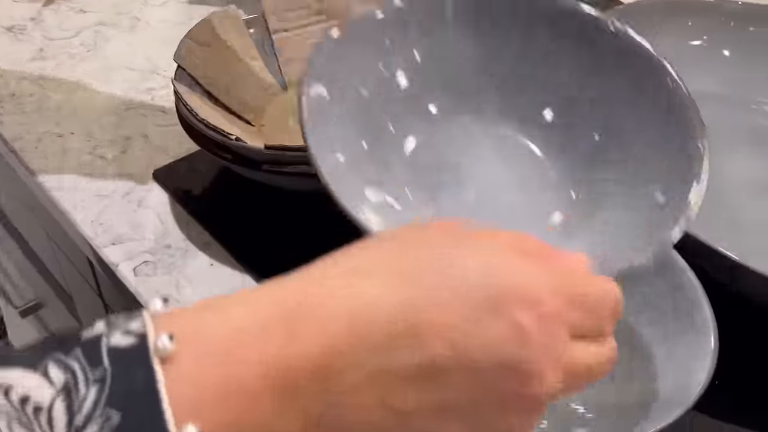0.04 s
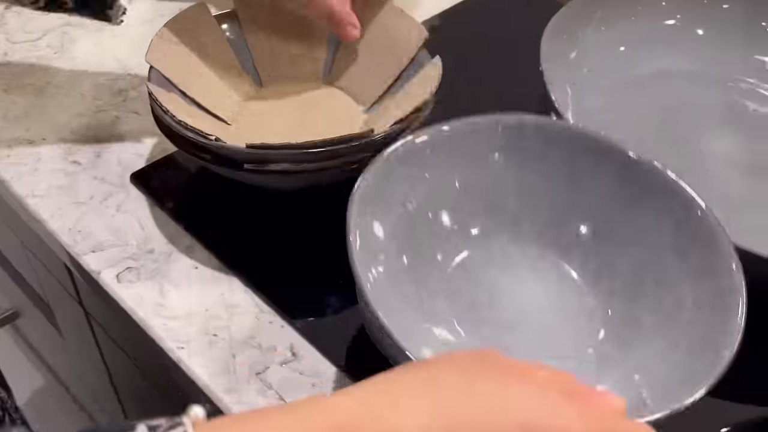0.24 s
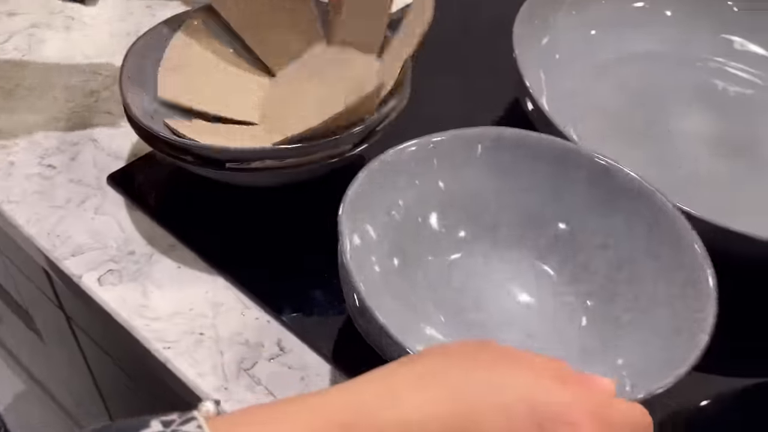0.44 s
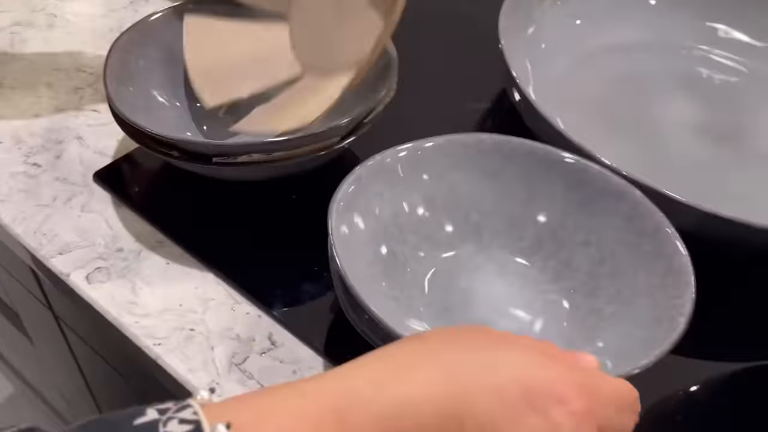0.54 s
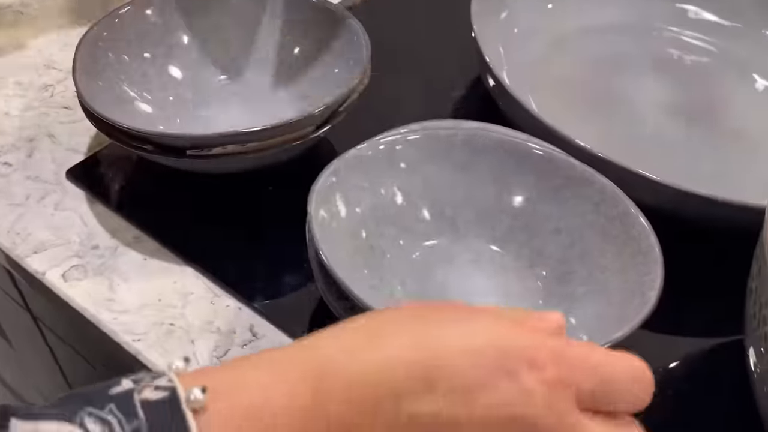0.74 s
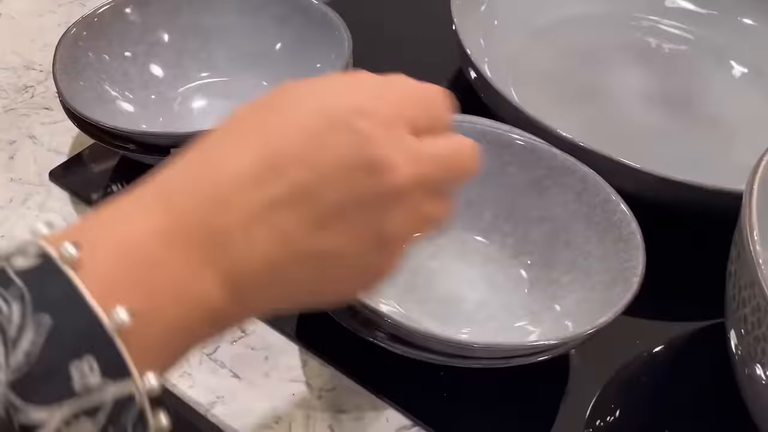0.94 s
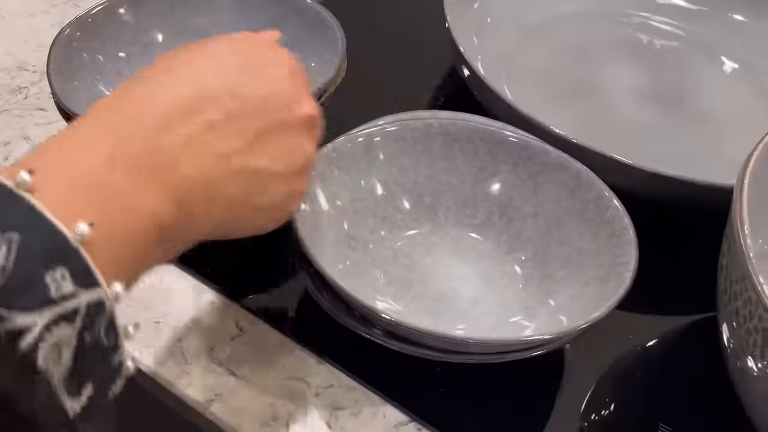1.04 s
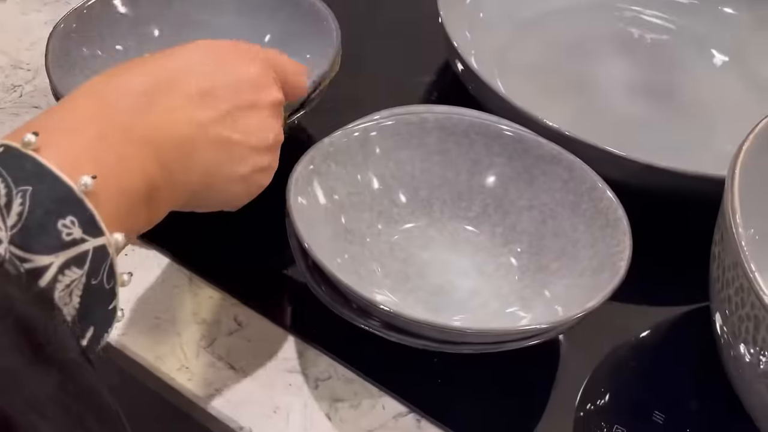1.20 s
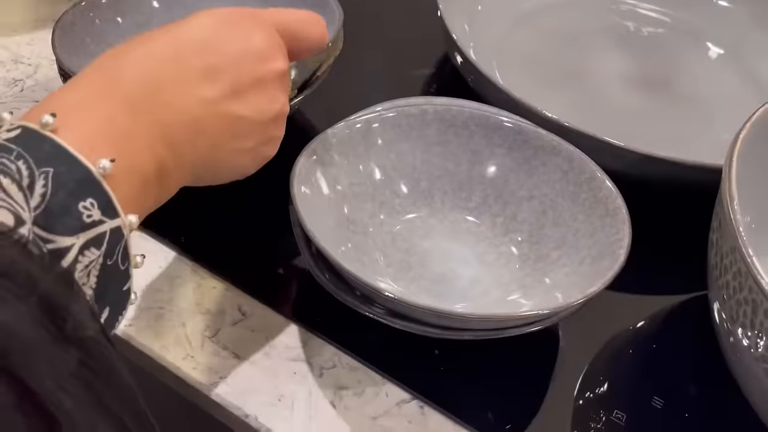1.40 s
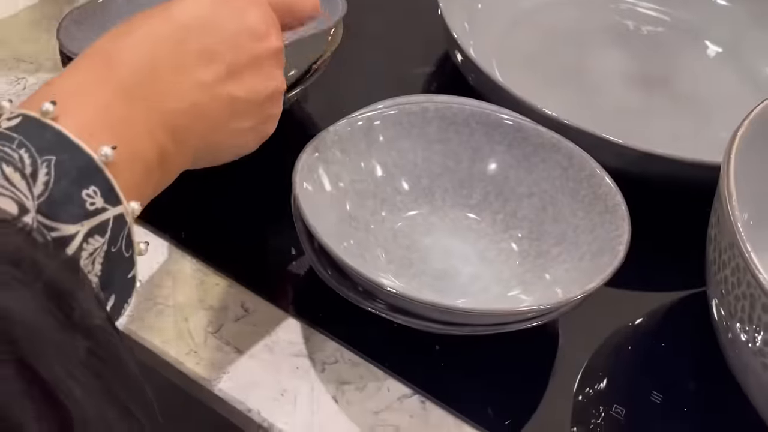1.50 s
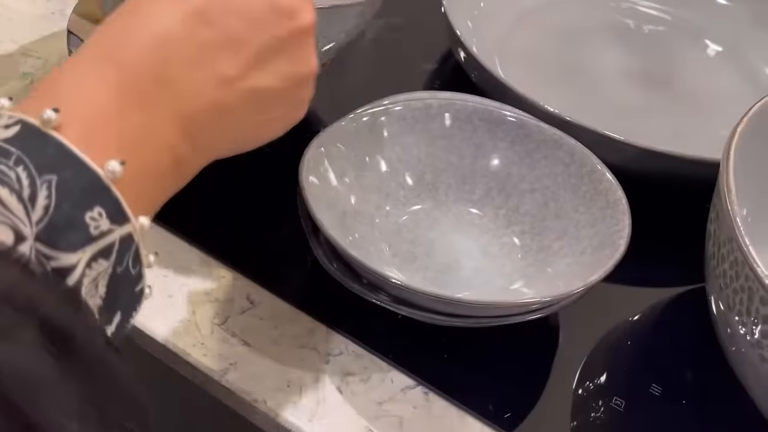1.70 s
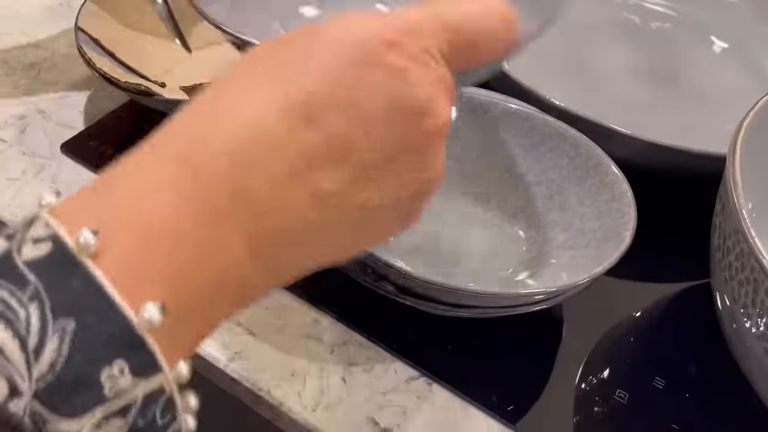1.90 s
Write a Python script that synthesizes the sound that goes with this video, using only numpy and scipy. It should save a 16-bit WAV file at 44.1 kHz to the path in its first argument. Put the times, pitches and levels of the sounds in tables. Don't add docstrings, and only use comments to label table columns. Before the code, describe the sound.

Two hard, short clinks of glazed bowls being stacked, followed by soft rustles and tiny touches

```python
import sys
import numpy as np
from scipy import signal
from scipy.fft import rfft, irfft
from scipy.io import wavfile
from scipy.ndimage import uniform_filter1d

SR = 44100
rng = np.random.default_rng(int(sys.argv[2]) if len(sys.argv) > 2 else 0)


def nominal_scale(level):
    x = np.asarray(level, float) / 20
    return 10 ** x


def unload_audio(sound):
    columns = np.transpose(np.atleast_2d(sound))
    steps = np.round(np.clip(columns, -1, 1) * 32767)
    wavfile.write(sys.argv[1], SR, steps.astype(np.int16))


N = 85995
T = np.arange(N) / SR

# frequency in Hz, level in dB.
HUM_COLOUR = [(30, -3.5), (80, -3.5), (270, -18.5), (900, -27.5), (1500, -39.5), (2400, -67), (10600, -57),
              (14000, -60.5)]
# frequency in Hz, level in dB.
HUM_TONES = [(62, -59), (513, -65), (1005, -80)]
# time in seconds, level in dB.
RUSTLE_LEVEL = [(0, -81), (.15, -78), (0.172, -54), (.3, -46.5), (0.499, -56), (.85, -72), (0.892, -46.5),
                (1.0, -55.5), (1.09, -57.5), (1.201, -55.5), (1.301, -62), (1.378, -48), (1.46, -58.5),
                (1.55, -75), (1.73, -84.5), (1.752, -54), (1.821, -64.5), (1.95, -86)]
# frequency in Hz, level in dB.
RUSTLE_COLOUR = [(300, 13), (900, -0.5), (2000, -8), (4000, -8.5), (6500, -11.5), (9000, -9),
                 (12500, -11.5), (14500, -32.5)]
# time in seconds, level in dB.
RUMBLE_LEVEL = [(0, -66), (.1, -51.5), (.22, -48), (.35, -62), (.56, -47), (.7, -63), (.87, -55),
                (1.05, -74), (1.6, -67), (1.95, -70)]
# start in seconds, level in dB, pitch in Hz,
# time to fall 60 dB in seconds.
KNOCKS = [(.062, -40.5, 600, 0.047), (0.089, -40.5, 602, 0.047), (.174, -42, 775, 0.15),
          (.248, -6.5, 927, 0.051), (.249, -6, 313.6, 0.04), (0.253, -8, 1295, 0.011),
          (.330, -17, 721, 0.052), (.333, -19, 238.5, 0.064), (.471, -16, 983, 0.024),
          (.474, -21, 208, 0.07), (0.4731, -19, 400, 0.063), (.482, -24, 524, 0.016),
          (.472, -30.5, 2950, 0.025), (.478, -32, 1760, 0.031), (0.536, -8, 975, 0.017),
          (.537, -5, 232, 0.03), (0.544, -32.5, 88, .3), (.549, -20.5, 888, .06), (.552, -23.5, 323, .05),
          (0.5597, -3, 869, 0.04), (.574, -21, 862, 0.12), (.610, -21, 902, 0.0374),
          (.562, -18.5, 392.6, 0.083), (.728, -39, 855, 0.17), (.78, -41.5, 895, 0.22),
          (0.894, -25.5, 457, 0.11), (0.915, -39, 205.4, 0.18), (0.944, -40.5, 248, 0.11),
          (.258, -18.5, 1006, 0.03), (.29, -28, 392, .05), (.58, -24, 884, .09), (0.5601, -15, 1750, 0.031),
          (.606, -30, 415, 0.066), (1.362, -37.5, 1410, .05), (1.139, -44, 200, 0.074),
          (.984, -43, 397, 0.035), (1.1389, -38.5, 464, 0.078), (1.154, -45.5, 585, 0.012),
          (1.360, -30, 770, 0.058), (1.361, -31, 377, 0.11), (1.399, -38.5, 353, 0.21),
          (1.435, -44, 801, 0.054), (1.487, -39.5, 352.3, 0.16), (1.798, -42, 322, 0.054),
          (1.866, -41.5, 320.6, 0.11)]
# start in seconds, end in seconds,
# first pitch in Hz, last pitch in Hz, level in dB.
SINGING_SLIDES = [(.17, .225, 2800, 2800, -61), (.17, .22, 1614, 1640, -63), (.27, .37, 4231, 4220, -45.5),
                  (.36, .52, 4215, 4231, -54.5), (.64, .86, 790, 930, -45), (.66, .87, 2790, 2700, -58.5),
                  (.68, .88, 2380, 2470, -59.5), (.7, .88, 1585, 1590, -61.5), (.76, 1.25, 1008, 999, -65),
                  (1.59, 1.645, 951, 961, -70.5), (.1, .165, 558, 598, -59.5)]
# start in seconds, end in seconds, first pitch in Hz,
# last pitch in Hz, level in dB.
FOOT_SCRAPES = [
    (1.27, 1.41, 3870, 4130, -68.5),
    (1.28, 1.4, 4800, 4500, -66),
    (1.33, 1.39, 3240, 3230, -63.5),
    (1.37, 1.45, 1400, 1313, -60.5),
]
# start in seconds, level in dB, centre in Hz,
# time to fall 60 dB in seconds.
CRACKS = [(.137, -60, 5000, 0.015), (0.169, -43.5, 6000, 0.03), (0.213, -45.5, 8950, 0.038),
          (0.240, -27, 1920, 0.054), (0.248, -10.5, 3227, 0.05), (.2575, -31, 4050, 0.034),
          (0.332, -34, 1800, 0.033), (.471, -31.5, 1578, 0.026), (0.529, -22, 2470, 0.05),
          (.5338, -15, 4700, 0.019), (.884, -40, 14400, .07), (1.205, -53, 14500, .05),
          (1.744, -58.5, 14920, .02), (0.534, -10, 3200, 0.043), (0.5335, -18, 9650, 0.044),
          (0.2475, -19.5, 12350, 0.045), (0.555, -20, 4480, 0.045), (1.285, -57.5, 4445, 0.24),
          (0.883, -41.5, 9100, 0.062), (0.892, -41, 3210, 0.067), (1.138, -55.5, 2563, 0.047),
          (1.209, -42, 10040, 0.01), (1.361, -47, 1810, 0.035), (1.430, -44.5, 4500, 0.038),
          (1.489, -55.5, 1370, 0.06), (1.599, -57.5, 12250, 0.19), (1.612, -58.5, 12060, 0.023),
          (1.640, -50, 11130, 0.029), (1.743, -51.5, 2980, 0.13), (1.7432, -53, 9900, 0.14),
          (1.864, -55.5, 1445, 0.046)]
# frequency in Hz, level in dB, time to fall 60 dB in seconds.
BOWL_A_MODES = [(1884, -10, .07), (2972, -7, .05), (3919, -6, .04), (4231, -1, .06), (5378, -8, .05),
                (6002, -9, .05), (8565, 0, .08), (9460, -10, .05), (10740, -10, .06), (10850, -10, .06),
                (11440, -13, .04), (12150, -10, .05), (13080, -14, .06), (4447, -12, .05)]
BOWL_B_MODES = [(1630, -8, .05), (2470, -10, .08), (2762, -4, .08), (4086, 1, .09), (4760, -9, .04),
                (5790, -10, .05), (7560, -9, .05), (9700, -16, .05), (10880, -7, .05), (11860, -15, .05),
                (13140, -19, .07), (3590, -12, .03)]
PLATE_MODES = [(1615, -11, .3), (2745, 0, .09), (4140, -24, .5), (5717, -2, .07)]
FOOT_MODES = [(3190, 0, .035), (2050, -8, .02)]
# start in seconds, level in dB, chatter length in seconds.
BOWL_A_CLINKS = [
    (0.17, -55.5, 0.00092),
    (0.2481, -20, 0.00034),
    (0.2529, -18.5, 0.0014),
    (0.2568, -18.5, 0.0011),
]
BOWL_B_CLINKS = [
    (0.533, -27.5, 0.00047),
    (0.540, -21, 0.00085),
    (0.5571, -26.5, 0.0013),
    (0.568, -35.5, 0.0012),
]
PLATE_CLINKS = [
    (1.781, -49.5, 0.0012),
    (1.844, -67, .001),
    (1.865, -69.5, 0.00098),
]
FOOT_CLINKS = [
    (.5555, -23, .0005),
    (.6015, -27, .001),
]
# frequency in Hz, lead in radians.
PORT_LEAD = [(0, 0), (2400, .5), (5400, 1.44), (6900, 0.5), (7700, -2.5), (8900, -3), (10600, -7),
             (12000, -5), (13500, -9)]
# frequency in Hz, left over right in dB.
PORT_BALANCE = [(100, 0), (1200, -.5), (2200, 4), (5000, 4), (7000, 0)]
# frequency in Hz, level in dB.
PORT_SPREAD = [(60, -16), (380, -7), (1300, -1), (4400, -8.5), (6500, -16), (14000, -17.5)]


def unit(x):
    return x / np.sqrt(np.mean(x ** 2))


def colour(x, points):
    hz, db = np.array(points, float).T
    f = np.fft.rfftfreq(x.shape[-1], 1 / SR) + 1
    gain = nominal_scale(np.interp(np.log(f), np.log(hz), db))
    return irfft(rfft(x) * gain, x.shape[-1])


def fade(t, t60):
    return np.exp(-np.log(1000) * t / max(t60, .003))


def add(out, start, x):
    i = max(int(start * SR), 0)
    out[i:i + len(x)] += x[:N - i]


def walk(rate_hz):
    k = int(SR / rate_hz)
    smooth = uniform_filter1d(rng.standard_normal(N), k)
    return unit(uniform_filter1d(smooth, k))


def band_noise(low_hz, high_hz, length):
    sos = signal.butter(2, [low_hz, high_hz], "band", fs=SR, output="sos")
    return unit(signal.sosfilt(sos, rng.standard_normal(length)))


def hum():
    tones = np.zeros(N)
    for hz, db in HUM_TONES:
        tones += nominal_scale(db + 2 * walk(7.3)) * np.sin(2 * np.pi * hz * T)
    air = colour(rng.standard_normal(N), HUM_COLOUR)
    return unit(air * nominal_scale(2.1 * walk(12.0))) * nominal_scale(-57) + tones


def rustle():
    grain_db = 3.29 * np.minimum(rng.exponential(size=N), 6)
    grains = colour(rng.standard_normal(N) * nominal_scale(grain_db), RUSTLE_COLOUR)
    out = np.zeros(N)
    for lo in (150, 400, 1000, 2500, 6000):
        band = colour(grains, [(lo / 2, -30), (lo, 0), (lo * 2.5, 0), (lo * 5, -30)])
        out += nominal_scale(3.0 * walk(30)) * band
    s, db = np.array(RUSTLE_LEVEL).T
    return unit(out) * nominal_scale(np.interp(T, s, db) + 2)


def rumble():
    s, db = np.array(RUMBLE_LEVEL).T
    deep = signal.butter(3, 75, fs=SR, output="sos")
    low = signal.sosfilt(deep, rng.standard_normal(N))
    return unit(low) * nominal_scale(np.interp(T, s, db))


def knocks():
    roughness, neighbour_spread, onset_cycles = 0.38, .12, 0.29
    out, t = np.zeros(N), T[:SR // 4]
    for s, db, hz, t60 in KNOCKS:
        tone = np.zeros(len(t))
        for k, gain in ((0.039, 0.83), (-1.3, 0.21), (1.4, 0.19)):
            tone += gain * np.sin(2 * np.pi * hz * (1 + k * neighbour_spread) * t)
        grit = band_noise(hz * 0.83, hz * 1.377, len(t))
        onset = 1 - np.exp(-t * hz / onset_cycles)
        add(out, s, nominal_scale(db) * (tone + roughness * grit) * fade(t, t60) * onset)
    return out


def slides(table, width_hz):
    out = np.zeros(N)
    for s, end, hz, to_hz, db in table:
        n = int((end - s) * SR)
        angle = 2 * np.pi * np.cumsum(np.linspace(hz, to_hz, n)) / SR
        edge = signal.windows.tukey(n, .25)
        band = walk(width_hz)[-n:] * np.sin(angle) + walk(width_hz)[-n:] * np.cos(angle)
        add(out, s, nominal_scale(db) * edge * band)
    return out


def cracks():
    out, t = np.zeros(N), T[:SR // 5]
    for s, db, hz, t60 in CRACKS:
        burst = band_noise(hz * max(0.51, hz / 16500), min(hz * 1.44, 16500), len(t))
        onset = 1 - np.exp(-t / (0.017 * t60))
        add(out, s, nominal_scale(db) * burst * fade(t, t60) * onset)
    return out


def ring(modes, clinks):
    split, partner, linger_db, linger_times, flutter_db = .008, .6, -20, 5, 2.2
    out, t = np.zeros(N), T[:SR // 2]
    for s, db, chatter in clinks:
        luck = rng.standard_normal((len(modes), 4))
        sway = np.tile(walk(90), 2)
        body = np.zeros(len(t))
        for (hz, mode_db, t60), (a, b, c, d) in zip(modes, luck):
            flutter = flutter_db * sway[hz * 5:][:len(t)]
            decay = fade(t, t60) + nominal_scale(linger_db) * fade(t, linger_times * t60)
            main = np.sin(2 * np.pi * hz * t + 2 * d)
            pair = partner * np.sin(2 * np.pi * hz * (1 + split * b) * t + 2 * c)
            body += nominal_scale(mode_db + 1.6 * a + flutter) * decay * (main + pair)
        add(out, s, nominal_scale(db) * body * (1 - np.exp(-t / max(chatter, .0002))))
    return out


def scatter(x):
    t = T[:SR // 20]
    echo = rng.standard_normal(len(t)) * fade(t, .02)
    return nominal_scale(-10.5) * signal.fftconvolve(x, echo / np.sqrt(np.sum(echo ** 2)))[:N]


def room(x):
    low_t60_s, high_t60_s, split_hz, gap_s = 0.99, 0.43, 6200, 0.0029
    t, noise = T[:SR], rng.standard_normal(SR)
    low = signal.sosfilt(signal.butter(1, split_hz, fs=SR, output="sos"), noise)
    echo = low * fade(t, low_t60_s) + (noise - low) * fade(t, high_t60_s)
    echo = echo * (1 - np.exp(-t / gap_s))
    return nominal_scale(-16.5) * signal.fftconvolve(x, echo / np.sqrt(np.sum(echo ** 2)))[:N]


def two_ports(mid, side):
    hz, rad = np.array(PORT_LEAD, float).T
    f = np.fft.rfftfreq(N, 1 / SR)
    balance = nominal_scale(np.interp(f, *np.array(PORT_BALANCE).T) / 2)
    turn = np.exp(.5j * np.interp(f, hz, rad)) * balance
    spec = rfft(mid)
    return np.array([irfft(spec * turn, N) + side, irfft(spec / turn, N) - side])


def scene():
    rings = ring(BOWL_A_MODES, BOWL_A_CLINKS) + ring(BOWL_B_MODES, BOWL_B_CLINKS)
    rings += ring(PLATE_MODES, PLATE_CLINKS) + ring(FOOT_MODES, FOOT_CLINKS)
    body_cut = signal.butter(2, 80, "high", fs=SR, output="sos")
    dull = signal.sosfilt(body_cut, knocks()) + cracks()
    into_room = nominal_scale(-5) * rings + dull
    friction = slides(SINGING_SLIDES, 45) + slides(FOOT_SCRAPES, 410)
    mid = rings + dull + room(into_room) + rustle() + hum() + friction + rumble()
    diffuse = room(into_room) + scatter(rings + dull) + rustle() + hum() + rumble()
    return two_ports(mid, colour(diffuse, PORT_SPREAD))


def roll_off(x):
    return signal.sosfilt(signal.butter(12, 16780, fs=SR, output="sos"), x)


def record(dry):
    x = colour(dry, [(25, -5), (80, 2.5), (13500, 1), (14500, -7.0), (16400, -12), (16800, -85.0)])
    mix = np.tanh(0.93 * x) / 0.89
    return roll_off(mix)


dry = scene()
out = record(dry)
unload_audio(out)
```